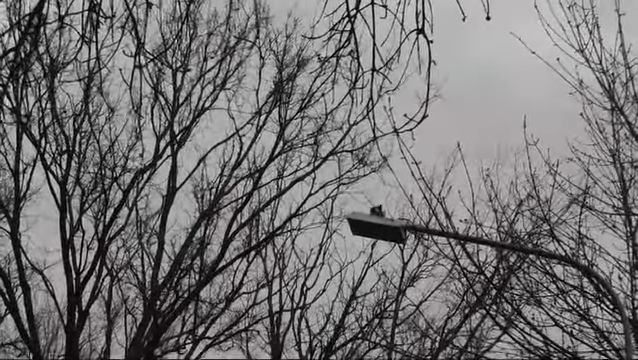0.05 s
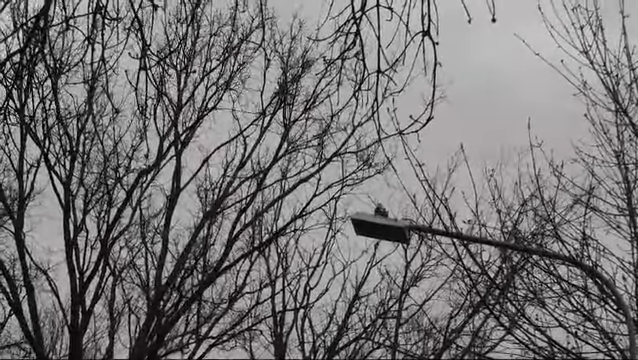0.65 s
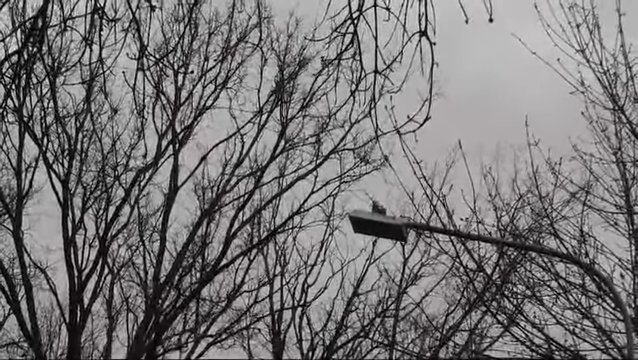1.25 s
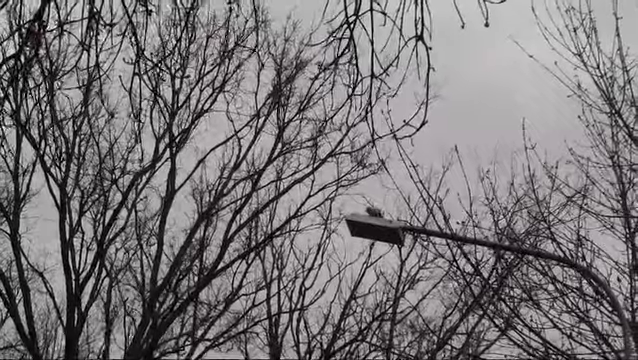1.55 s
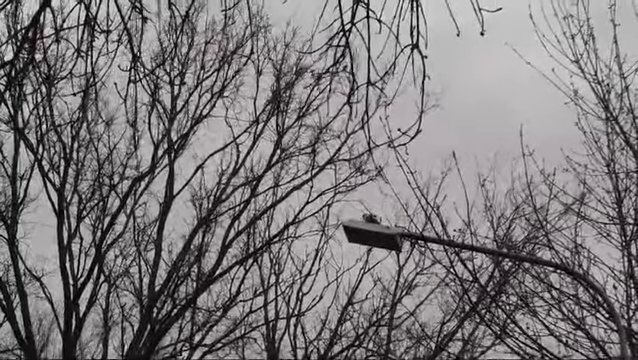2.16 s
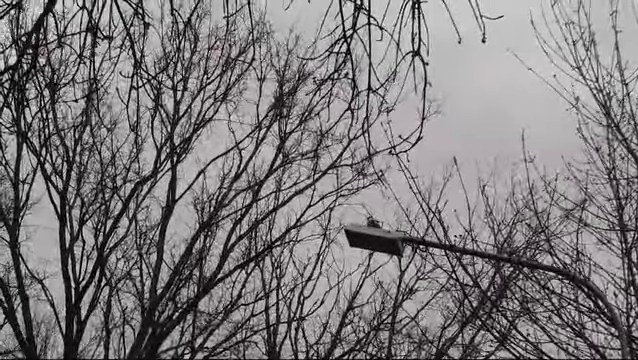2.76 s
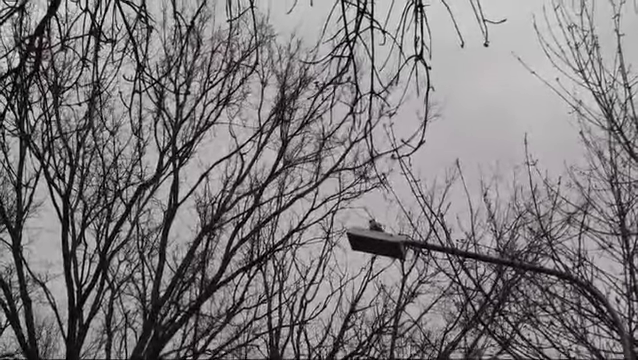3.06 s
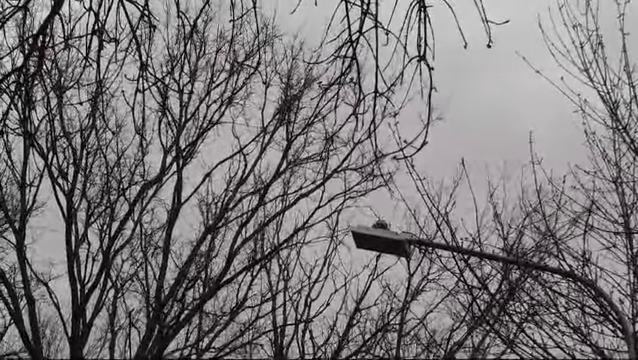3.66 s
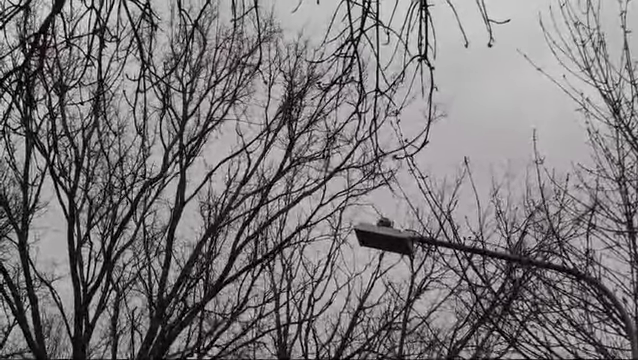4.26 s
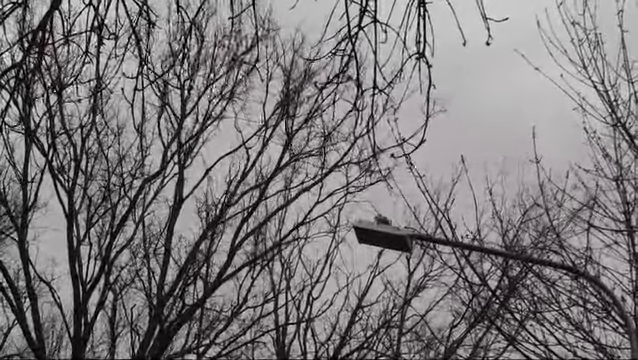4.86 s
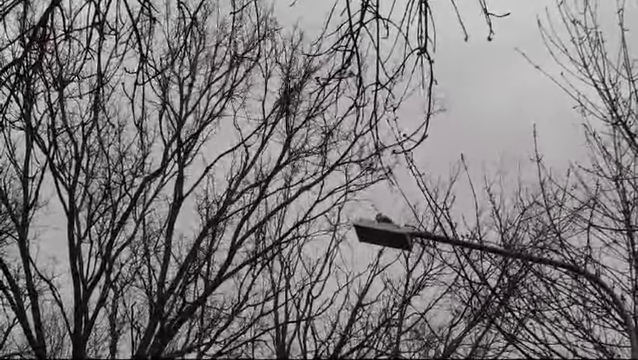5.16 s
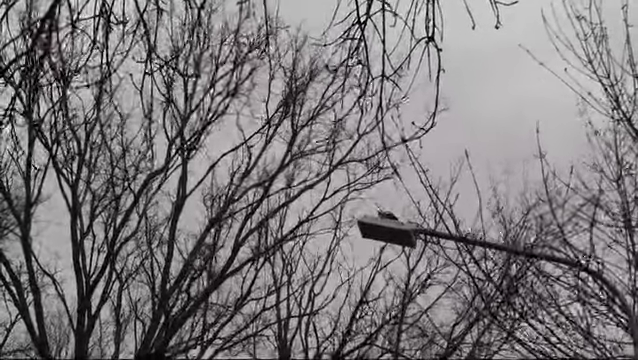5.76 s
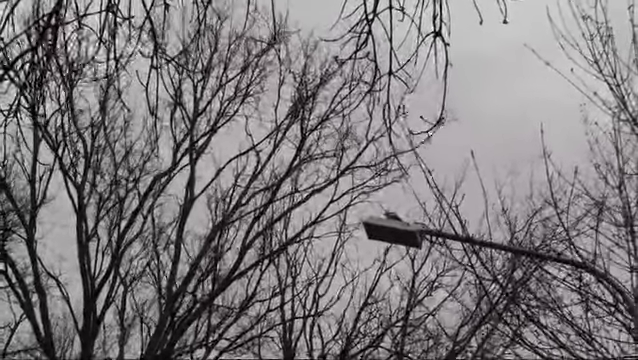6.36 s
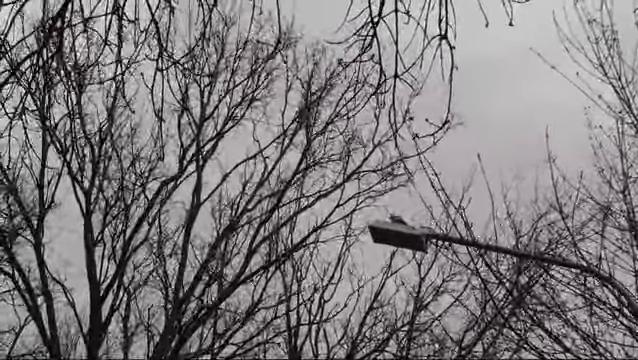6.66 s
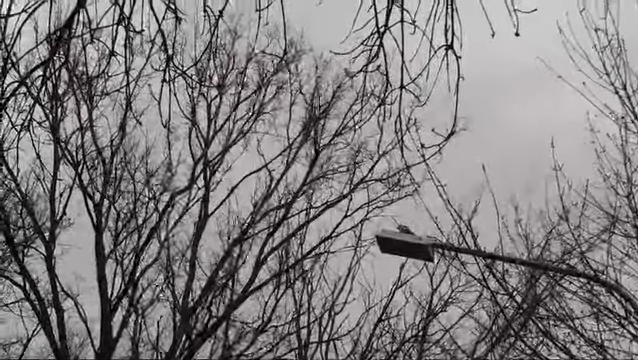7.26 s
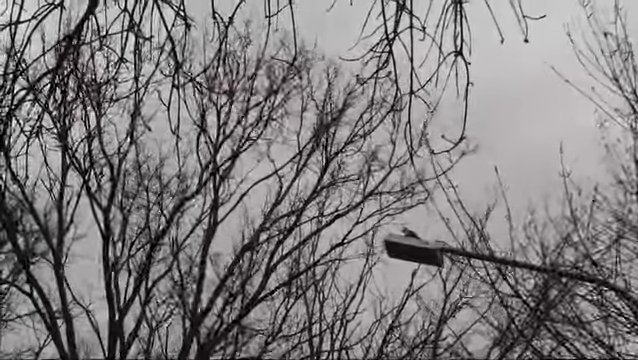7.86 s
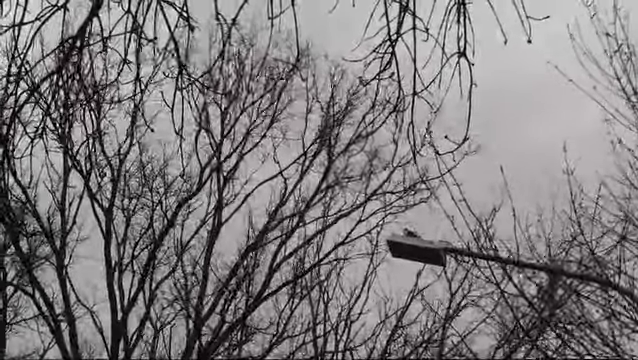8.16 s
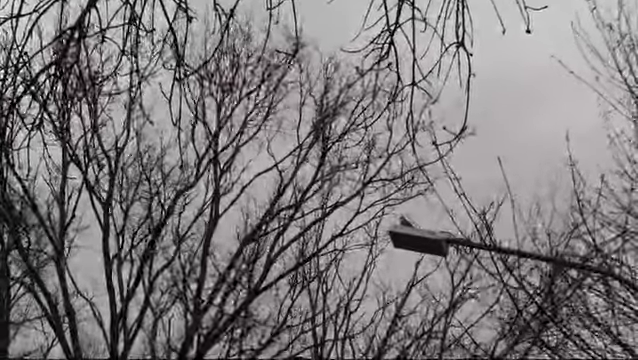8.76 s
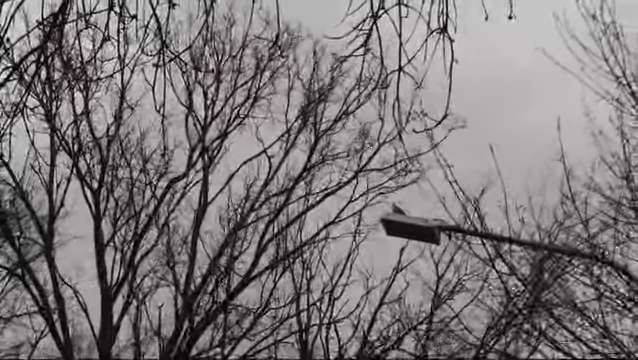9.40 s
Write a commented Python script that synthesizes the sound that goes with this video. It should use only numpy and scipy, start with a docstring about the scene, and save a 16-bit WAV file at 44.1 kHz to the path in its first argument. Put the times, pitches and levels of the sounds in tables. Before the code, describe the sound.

Distant traffic hums steadily outdoors while wind buffets the microphone with dull, low thumps, mostly on the right. A finch repeats a faint burry call. About halfway through, a woodpecker drums one quick, ringing roll on a metal street lamp, echoing briefly. The engine rumble grows a little, the finch sings soft buzzes and trills, and something rustles lightly close by near the end.

```python
"""A woodpecker drums one quickening roll on a street lamp's metal head among bare trees.
Each blow rings the head's modes and rattles its housing; ground, trees and house fronts reflect it.
A finch repeats a burry call, then sings buzzes and falling trills, all short whistled sweeps.
Distant tyres and engines hum; gusts buffet the microphone ports and eddies thump on the right one.
A brief hiss dies away at the start; near the end something rustles close by, over faint mic hiss."""
import sys
import numpy as np
from scipy import signal
from scipy.fft import rfft, irfft, next_fast_len
from scipy.io import wavfile

SR = 44100
rng = np.random.default_rng(int(sys.argv[2]) if len(sys.argv) > 2 else 0)


def inscribe(sig):
    """Save sig as 16-bit PCM at rate SR to the path in sys.argv[1].

    A 1-D sig is mono; a 2-D sig holds one channel per row.
    Samples are clipped to [-1, 1] before scaling.
    """
    pcm = np.round(np.clip(np.atleast_2d(sig).T, -1, 1) * 32767)
    wavfile.write(sys.argv[1], SR, pcm.astype(np.int16))


N = 424683

# lamp head modes (frequency [Hz], level [dB], t60 [s])
LAMP_MODES = [(660, -9, .026), (795, -16.5, .05), (1011, -0.8, .068), (1150, -10, .045), (1300, -13.5, .04),
              (1495, -9.5, .016), (1640, -13, .045), (1812, -15, .036), (2025, -15.5, .027),
              (2462, -15, .021), (3385, -16.5, .024), (3720, -17.5, .02), (4450, -19, .01),
              (5030, -25, .022), (5220, -15, .025), (8950, -39, .015)]
# the housing's many weak modes (frequency [Hz], density [dB])
CLATTER_SPECTRUM = [(500, -23), (1000, -15), (1800, -3), (2700, -4.5), (5200, -8), (6300, -20.5),
                    (9000, -24.5), (11500, -40), (15500, -57)]
# dry snap of the beak tip (frequency [Hz], density [dB])
SNAP_SPECTRUM = [(2500, 2), (5000, 8), (8000, -16), (11000, -16), (15000, -35)]
# the roll, quickening and tiring (time [s], strength [dB], hardness [dB])
BLOWS = [(4.8175, -4, -5), (4.8793, 0, -2), (4.9385, 0, -1), (4.995, 1, 0.5), (5.0506, 0.5, 4),
         (5.1023, 1.5, 2), (5.1516, 0, 1), (5.1979, -0.3, 1.5), (5.2422, -0.5, -1), (5.2849, -2.5, -0.5),
         (5.329, -5, 2), (5.368, -3, -2), (5.407, -8.5, 1), (5.4441, -11, 1)]
# treble lift per dB of hardness (frequency [Hz], share [0..1])
HARDNESS_SHARE = [(4500, 0.05), (7000, 0.9)]
# reflections of a blow, ground first (delay [s], level [dB])
REFLECTIONS = [(.00614, 0), (.0098, -14), (.01555, -7.5)]

# finch calls (time [s], level [dB], centre [Hz])
CALLS = [(.78, -54, 3580), (1.773, -49.5, 3635), (2.88, -55, 3650), (3.94, -51.5, 3560),
         (5.79, -53.5, 3580), (6.83, -56, 3550)]
# song buzzes (start [s], length [s], centre [Hz], level [dB])
BUZZES = [(6.622, 0.085, 4410, -58.5), (6.826, 0.095, 4710, -52), (7.012, 0.055, 5950, -64),
          (7.079, 0.12, 4500, -49.5), (7.272, 0.059, 6200, -66), (7.349, 0.135, 4480, -47.5),
          (8.977, 0.13, 5500, -58.5)]
# notes of each trill's syllable (delay [s], from [Hz], to [Hz], length [s], level [dB])
FAST_SYLLABLE = [(0, 5150, 4600, .008, -53), (.007, 4400, 3400, .019, -47.5),
                 (.065, 6050, 5300, .008, -59.5)]
SLOW_SYLLABLE = [(0, 3100, 3400, .028, -55.5), (.037, 4300, 2600, .032, -48), (.131, 4650, 5650, .016, -55)]
# trills (start [s], period [s], syllables [count])
FAST_TRILL, SLOW_TRILL = (7.537, .0836, 8), (8.193, .1595, 5)
# closing upslurs (time [s], centre [Hz], level [dB])
SLURS = [(8.61, 3540, -50), (8.66, 3600, -51.5), (8.92, 4960, -58), (9.122, 4010, -50), (9.224, 3040, -52),
         (9.54, 3140, -57)]

# tyre roar and exhaust rumble (frequency [Hz], density [dB])
TYRE_SPECTRUM = [(100, -22), (250, -6.5), (450, -4.5), (700, -0.5), (1050, 1.5), (1400, -6), (2000, -13),
                 (2700, -21), (4000, -21), (5300, -27), (6400, -40.5), (9000, -59), (15000, -60.5)]
RUMBLE_SPECTRUM = [(20, -19.5), (35, -8.5), (50, 4.5), (75, -2), (120, -2), (165, -5), (220, -13.5),
                   (350, -16.5), (600, -29)]
# tyre roar balance (frequency [Hz], left minus right [dB])
TYRE_BALANCE = [(500, 1.5), (1200, 1), (2000, -2.5), (2500, -5), (3300, -3.5), (4500, 8), (5400, 5),
                (6200, -5)]
# left-right likeness of traffic (frequency [Hz], correlation [-1..1])
TRAFFIC_CORRELATION = [(30, 0.99), (150, 0.95), (300, 0.94), (500, 0.55), (800, 0.36), (1250, -0.5),
                       (2000, 0.061), (3400, -0.038), (6000, -0.0056)]
# nearer engines (start [s], length [s], from [Hz], to [Hz], level [dB])
ENGINE_NOTES = [(-.35, 1.38, 121, 101.4, -42), (4.699, 1.54, 102.1, 81.16, -43),
                (6.2, 0.993, 156.1, 146.1, -45), (8.7, 0.57, 108.1, 88.4, -41.5)]

# wind on the ports (frequency [Hz], density [dB])
BUFFET_SPECTRUM = [(15, 7.5), (30, -4), (60, -2.5), (110, -9), (220, -19), (450, -32.5), (900, -63.5)]
# gusts (start [s], length [s], left [dB], right [dB])
GUSTS = [(0, 0.97, -50, -37.5), (1.2, 0.18, -47, -38), (1.746, 0.18, -38.5, -44),
         (2.005, 0.79, -48.5, -32.5), (3.226, 0.088, -50, -35.5), (3.93, 0.21, -49, -35),
         (4.64, 0.24, -39.5, -47), (5.6, 0.26, -50, -47), (9.497, .3, -47, -33.5)]
# hardest eddies, right port (time [s], peak [dB], upper edge [Hz])
HARD_EDDIES = [(2.007, -15, 392), (2.118, -20, 414), (2.175, -22, 260), (2.213, -25.5, 330),
               (2.331, -16.5, 368), (2.351, -25, 380), (2.386, -19, 480), (2.436, -25, 400),
               (2.489, -23, 650), (2.555, -26, 300), (2.685, -20, 400), (2.739, -17, 378),
               (2.878, -15, 400), (2.904, -13.5, 520), (2.958, -25.5, 350), (2.993, -24, 430),
               (3.114, -26.5, 520), (3.239, -18.5, 170), (3.33, -22.5, 190), (3.824, -24, 405),
               (3.883, -25, 350)]

# close rustle and its ticks (frequency [Hz], density [dB])
RUSTLE_SPECTRUM = [(2000, 4), (3300, 19.5), (5500, 5.5), (7000, 0), (10000, -3.5), (13000, -19),
                   (15500, -21)]
TICK_SPECTRUM = [(3000, -14), (5000, -6), (6400, 11), (8000, -3), (10500, -7), (13000, -23), (15500, -26)]
# first row: brief hiss at the very start; later rows: brushes (time [s], level [dB])
HISS_AND_BRUSHES = [(0, -51), (1.22, -76), (5.935, -57), (8.912, -59), (9.0, -79), (9.25, -68)]
# small ticks in the rustle (time [s], level [dB])
TICKS = [(8.777, -58), (9.02, -52), (9.275, -46)]
# microphone self-noise (frequency [Hz], density [dB])
HISS_SPECTRUM = [(3000, 5), (5600, 3.5), (6700, -17), (7400, 1), (8100, 7), (9500, -3.5), (12000, -15),
                 (15500, -20)]


def beak_blow(housing, hardness_db, ring_db=-29, clatter_db=-43, clatter_t60_s=.061, repeat_share=.24,
              snap_db=-51, snap_t60_s=.03, contact_s=.00046, detune_share=.0035, vary_db=.7):
    """One knock: ringing modes, housing clatter, beak snap. Harder contact lifts the treble."""
    t = np.arange(len(housing)) / SR
    hz, mode_db, t60_s = np.transpose(LAMP_MODES)[:, :, None]
    signs = (-1) ** np.arange(len(hz))[:, None]
    # grip and beak load the sheet differently on each blow
    detune = 1 + detune_share * rng.standard_normal(hz.shape)
    modes = signs * np.sin(2 * np.pi * hz * detune * t) * from_db(mode_db - 60 * t / t60_s)
    ring = from_db(ring_db + vary_db * rng.standard_normal(len(hz))) @ modes
    fresh = noise(CLATTER_SPECTRUM, len(t))[0]
    clatter = np.sqrt(repeat_share) * housing + np.sqrt(1 - repeat_share) * fresh
    clatter *= from_db(clatter_db - 60 * t / clatter_t60_s)
    snap = noise(SNAP_SPECTRUM, len(t))[0] * from_db(snap_db - 60 * t / snap_t60_s)
    blow = (ring + clatter) * np.minimum(t / contact_s, 1) + snap
    tilt = from_db(hardness_db * at_hz(HARDNESS_SHARE, bin_hz(len(t))))
    return irfft(rfft(blow) * tilt)[:len(t) // 2]


def woodpecker(ground_hz=9000, tail_db=-4.5, twigs_db=-1, twigs_hz=6300, lag_s=.0001, shade_hz=4200):
    """Blows on one spot, so much alike; the street reflects them, thin twigs scatter the treble."""
    housing = noise(CLATTER_SPECTRUM, SR // 4)[0]
    lamp = np.zeros(N)
    for s, db, hardness_db in BLOWS:
        add(lamp, s, from_db(db) * beak_blow(housing, hardness_db))
    reflected = sum(from_db(db) * delayed(lamp, s) for s, db in REFLECTIONS)
    near = lamp + low_pass(reflected, ground_hz, order=1)
    tail = from_db(tail_db) * scatter(near, t60_s=.83, top_hz=5500, build_s=.036)
    treble = signal.sosfilt(signal.butter(2, twigs_hz, "high", fs=SR, output="sos"), near)
    twigs = from_db(twigs_db) * scatter(treble, t60_s=.53, top_hz=12000, build_s=.0034)
    # lamp slightly to the right: left is later and duller
    left = low_pass(delayed(near, lag_s), shade_hz, order=1)
    return np.array([left, near]) + tail + twigs


def finch_calls(gap_s=.0195, fall_hz=520, climb_hz=6, level_db=-5.5, pulses=6):
    """Each burry call is a quick, uneven run of falling pulses that swells in and climbs slightly."""
    voice = np.zeros(N)
    for s, db, hz in CALLS:
        for k in range(pulses):
            late_share, vary_db = rng.standard_normal(2) * [.16, 1.5]
            centre_hz = hz + climb_hz * (k - pulses // 2)
            gain = from_db(level_db + db + vary_db) * swell(k, notes=.7)
            pulse = glide(centre_hz + fall_hz / 2, centre_hz - fall_hz / 2, length_s=.014)
            add(voice, s + gap_s * (k + late_share), gain * pulse)
    return through_trees(voice, branches_db=0, echo_db=3, echo_t60_s=1.35, left_db=2.5)


def finch_song(buzz_db=-6, fast_db=-7.3, slow_db=-8, slur_db=-7, buzz_gap_s=.0192, jitter_s=.002):
    """Buzzes of rising pulses, a fast and a slow trill, closing upslurs."""
    voice = np.zeros(N)

    def sing(s, from_hz, to_hz, length_s, db, gain=1):
        gain *= from_db(db + 1.5 * rng.standard_normal())
        add(voice, s, gain * glide(from_hz, to_hz, length_s))

    def upslur(s, hz, db, rise_share, length_s, gain=1):
        sing(s, hz * (1 - rise_share / 2), hz * (1 + rise_share / 2), length_s, db, gain)

    def trill(start_s, period_s, count, syllable, level_db, swells):
        for k in range(count):
            gain = swell(k, notes=.78) if swells else 1
            for delay_s, from_hz, to_hz, length_s, db in syllable:
                sing(start_s + k * period_s + delay_s, from_hz, to_hz, length_s, level_db + db, gain)

    for start_s, length_s, hz, db in BUZZES:
        for k, s in enumerate(np.arange(start_s, start_s + length_s, buzz_gap_s)):
            centre_hz = hz * (1 + .067 * (1 - (s - start_s) / length_s) ** 2)  # starts high, settles
            onset_s = s + jitter_s * rng.standard_normal()
            upslur(onset_s, centre_hz, buzz_db + db, rise_share=.3, length_s=.011, gain=swell(k, 2))
    trill(*FAST_TRILL, FAST_SYLLABLE, fast_db, swells=True)
    trill(*SLOW_TRILL, SLOW_SYLLABLE, slow_db, swells=False)
    for s, hz, db in SLURS:
        upslur(s, hz, slur_db + db, rise_share=.158, length_s=.0259)
    return through_trees(voice, branches_db=2.5, echo_db=7.5, echo_t60_s=.95, left_db=2.3)


def through_trees(voice, branches_db, echo_db, echo_t60_s, left_db, wall_s=.042, wall_db=-13):
    """Branches blur a far bird's notes, a house front repeats them, the street adds a long echo."""
    blur = from_db(branches_db) * scatter(voice, t60_s=.11, top_hz=12000, build_s=.0011)
    wall = from_db(wall_db) * delayed(voice, wall_s)
    echo = from_db(echo_db) * scatter(voice, t60_s=echo_t60_s, top_hz=12000, build_s=.015)
    return (voice + blur + wall + echo) * from_db([[left_db], [-left_db]])


def tyres(start_db=-46, growth_db_per_s=.1848):
    """Distant tyre roar, slowly growing, coloured differently on each side."""
    t = np.arange(N) / SR
    padded = next_fast_len(N)
    balance = from_db(at_hz(TYRE_BALANCE, bin_hz(padded)) * [[.5], [-.5]])
    roar = noise(TYRE_SPECTRUM, correlation=TRAFFIC_CORRELATION)
    roar = irfft(rfft(roar, padded) * balance, padded)[:, :N]
    return from_db(start_db + growth_db_per_s * t) * roar


def engines(approach_start_s=4.1, approach_s=2.2, drone_hz=100.5, drone_width_hz=20, waver_db=2):
    """Exhaust rumble and blurred drone of engines drawing near; a few stand out as sinking notes."""
    t = np.arange(N) / SR
    nearness = np.clip((t - approach_start_s) / approach_s, 0, 1)
    rumble_db = -46 + 5.5 * nearness
    drone_db = -56.5 + 12 * nearness ** 4
    rumble = from_db(rumble_db) * noise(RUMBLE_SPECTRUM, correlation=TRAFFIC_CORRELATION)
    phase = 2 * np.pi * drone_hz * t
    drone = unit_rms(drift(drone_width_hz) * np.sin(phase) + drift(drone_width_hz) * np.cos(phase))
    notes = np.zeros(N)
    for s, length_s, from_hz, to_hz, db in ENGINE_NOTES:
        add(notes, s, from_db(db) * glide(from_hz, to_hz, length_s))
    return rumble + from_db(drone_db) * drone + notes * from_db(waver_db * drift(rate_hz=11))


def gust_strength(rise_s=.12, fall_s=.11, calm_db=-48.5):
    """Wind gain per port: gusts rise, hold and die away over light air."""
    t = np.arange(N) / SR
    power = np.full((2, N), from_db(calm_db) ** 2)
    for start_s, length_s, left_db, right_db in GUSTS:
        before_s, after_s = np.maximum(start_s - t, 0), np.maximum(t - start_s - length_s, 0)
        shape = np.exp(-before_s / rise_s - after_s / fall_s)
        power += (from_db([[left_db], [right_db]]) * shape) ** 2
    return np.sqrt(power)


def eddies(strength, max_per_s=12, length_s=.0188, dull_hz=190, small_top_hz=330, spread_db=4):
    """Dull puffs of turbulence: hard timed ones, and small ones denser and louder in strong gusts."""
    births = np.flatnonzero(rng.random(N) < max_per_s / SR * (strength / strength.max()) ** 5)
    peaks_db = 20 * np.log10(strength[births]) + 3 + spread_db * rng.standard_normal(len(births))
    small = [(i / SR, db, small_top_hz) for i, db in zip(births, peaks_db)]
    t = np.arange(SR // 10) / SR
    thumps = np.zeros(N)
    for s, db, top_hz in HARD_EDDIES + small:
        swirl = rng.standard_normal(len(t)) * np.sin(np.pi * np.minimum(t / length_s, 1))
        puff = low_pass(low_pass(swirl, dull_hz, order=1), top_hz, order=4)
        add(thumps, s, from_db(db) * puff / np.abs(puff).max())
    return thumps


def wind(lumpy_db=3.5):
    """Each microphone port has its own lumpy rumble; eddies hit the right one."""
    strength = gust_strength()
    buffet = [unit_rms(side * from_db(lumpy_db * drift(rate_hz=7))) for side in noise(BUFFET_SPECTRUM)]
    ports = strength * buffet
    ports[1] += eddies(strength[1])
    return ports


def opening_hiss_and_rustle(rub_start_s=8.97, rub_db=-61.5, grain_db=1, attack_s=.0067, fade_t60_s=.18,
                            tick_trim_db=-8, tick_t60_s=.026):
    """A brief hiss dies away at the very start; later come brushes, then grainy rubbing and ticks."""
    level = from_db(rub_db) * (np.arange(N) / SR > rub_start_s)
    t = np.arange(SR // 2) / SR
    for s, db in HISS_AND_BRUSHES:
        add(level, s, from_db(db - 60 * t / fade_t60_s) * np.minimum(t / attack_s, 1))
    ticks = np.zeros(N)
    for s, db in TICKS:
        add(ticks, s, from_db(db + tick_trim_db - 60 * t / tick_t60_s))
    grain = from_db(grain_db * drift(rate_hz=45))
    return level * grain * noise(RUSTLE_SPECTRUM) + ticks * noise(TICK_SPECTRUM)


def microphone_hiss(left_db=-74, right_db=-87):
    """Steady self-noise, louder on the left."""
    return noise(HISS_SPECTRUM) * from_db([[left_db], [right_db]])


def scatter(x, t60_s, top_hz, build_s):
    """Diffuse tail from trees and house fronts, different on each side."""
    t = np.arange(2 * SR) / SR
    tail = rng.standard_normal((2, len(t))) * from_db(-60 * t / t60_s) * (1 - np.exp(-t / build_s))
    tail = low_pass(tail / np.sqrt(np.sum(tail ** 2) / 2), top_hz, order=1)
    return signal.fftconvolve(x[None], tail, axes=1)[:, :N]


def glide(from_hz, to_hz, length_s, detune_share=.015):
    """Sine sweep with soft ends, randomly detuned."""
    size = max(int(length_s * SR), 8)
    hz = np.linspace(from_hz, to_hz, size) * (1 + detune_share * rng.standard_normal())
    return np.sin(2 * np.pi * np.cumsum(hz) / SR) * signal.windows.tukey(size, .5)


def swell(k, notes):
    """Gain of note k in a run that swells in."""
    return 1 - np.exp(-(k + 1) / notes)


def noise(spectrum, size=N, correlation=None):
    """Coloured stereo noise, rms 1, rolling off past the table's ends."""
    padded = next_fast_len(size)
    hz = bin_hz(padded) + 1
    mid, side = rfft(rng.standard_normal((2, padded)))
    alike = np.clip(at_hz(correlation, hz), -1, 1) if correlation else 0
    skirts = np.minimum(1, hz / spectrum[0][0]) ** 2 * np.minimum(1, spectrum[-1][0] / hz) ** 2
    stereo = np.sqrt(1 + alike) * mid + np.sqrt(1 - alike) * side * [[1], [-1]]
    return unit_rms(irfft(stereo * skirts * from_db(at_hz(spectrum, hz)), padded)[:, :size])


def drift(rate_hz):
    """Smooth random wander, rms 1."""
    knots = rng.standard_normal(4000)
    return unit_rms(np.interp(np.arange(N) / SR * 2 * rate_hz, np.arange(len(knots)), knots))


def from_db(db):
    return 10 ** (np.asarray(db) / 20)


def unit_rms(x):
    return x / np.sqrt(np.mean(x ** 2) + 1e-20)


def bin_hz(size):
    return np.arange(size // 2 + 1) * SR / size


def at_hz(points, hz):
    """Interpolate a table over log frequency."""
    knots_hz, values = np.transpose(points)
    return np.interp(np.log(np.maximum(hz, 1)), np.log(knots_hz), values)


def add(track, s, sound):
    """Mix in at time s, which may be negative."""
    i = int(s * SR)
    sound, i = sound[max(-i, 0):], max(i, 0)
    track[i:i + len(sound)] += sound[:max(N - i, 0)]


def delayed(x, s):
    return np.interp(np.arange(N) - s * SR, np.arange(N), x, left=0)


def low_pass(x, hz, order):
    return signal.sosfilt(signal.butter(order, hz, fs=SR, output="sos"), x)


def scene():
    """All sources at the two microphones."""
    birds = woodpecker() + finch_calls() + finch_song()
    return birds + tyres() + engines() + opening_hiss_and_rustle() + microphone_hiss() + wind()


def record(dry, cutoff_hz=15700):
    """Steep low-pass."""
    return signal.sosfilt(signal.ellip(10, .1, 80, cutoff_hz, fs=SR, output="sos"), dry)


dry = scene()
out = record(dry)
inscribe(out)
```